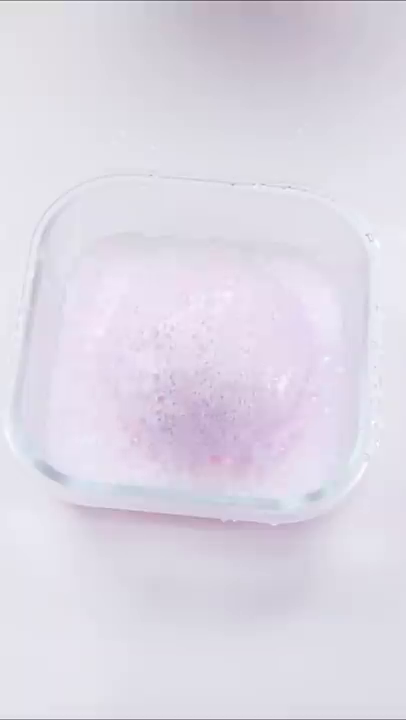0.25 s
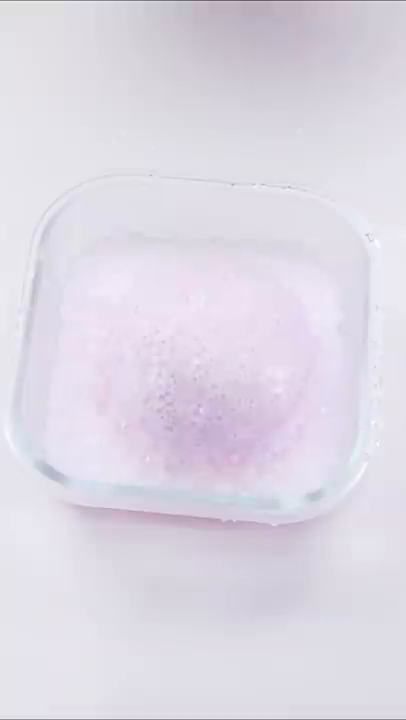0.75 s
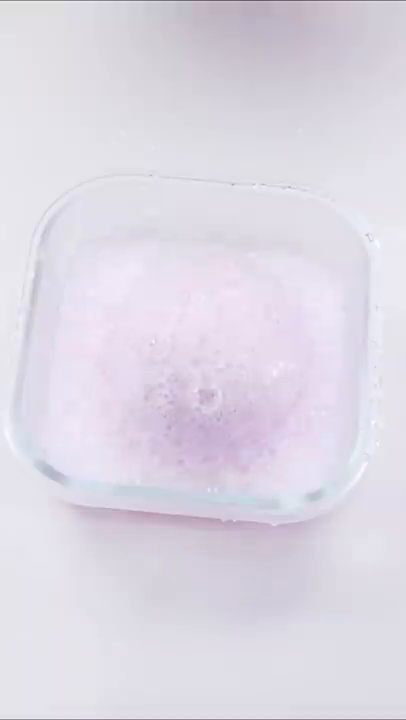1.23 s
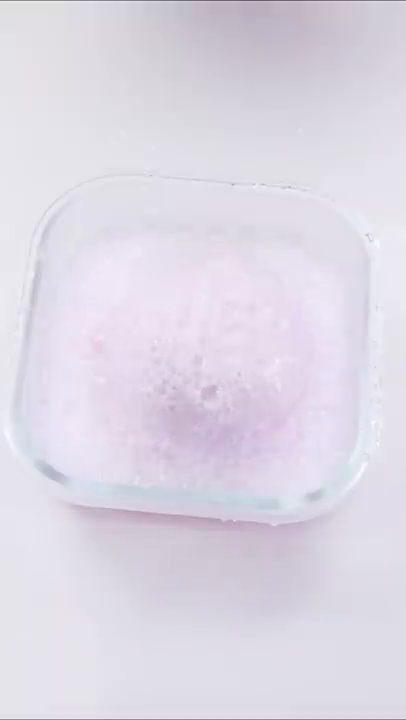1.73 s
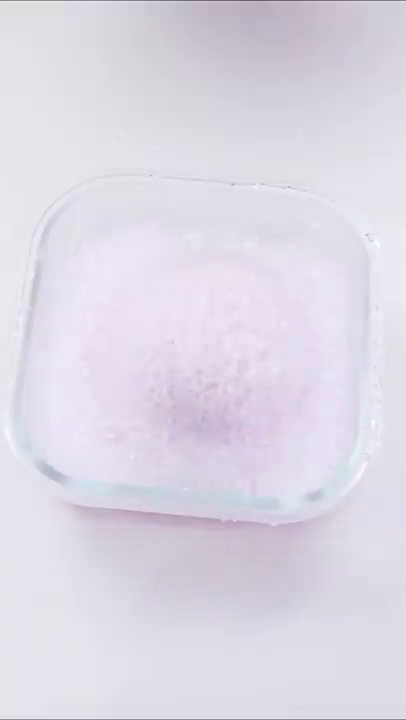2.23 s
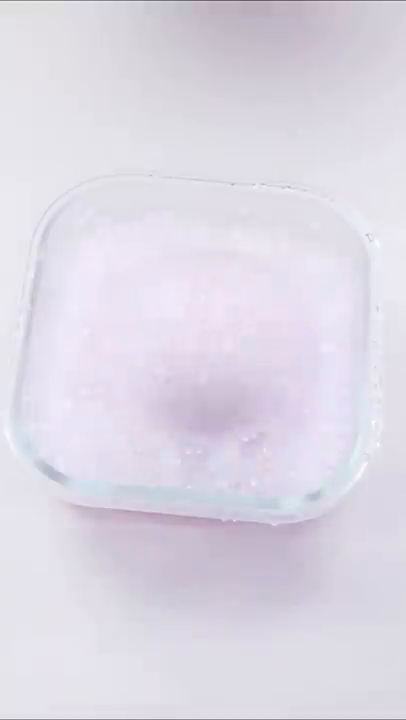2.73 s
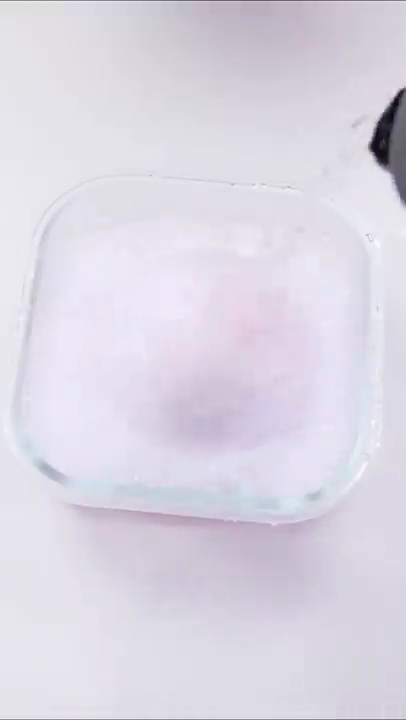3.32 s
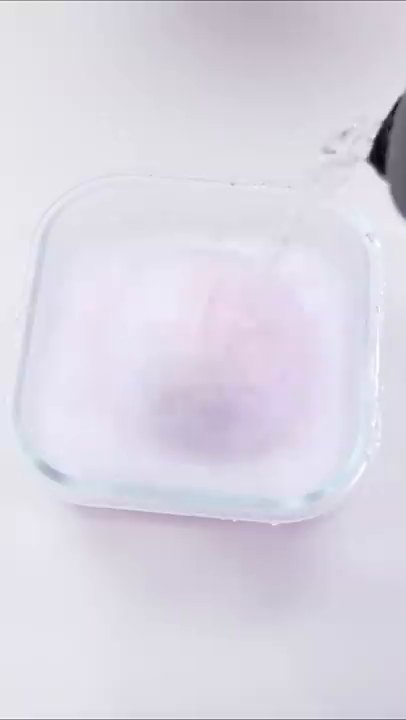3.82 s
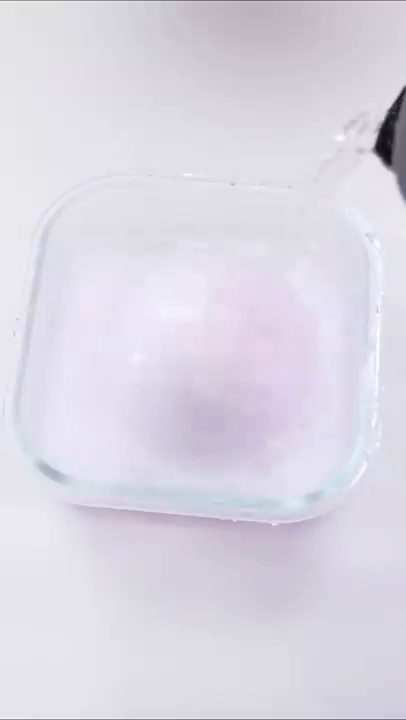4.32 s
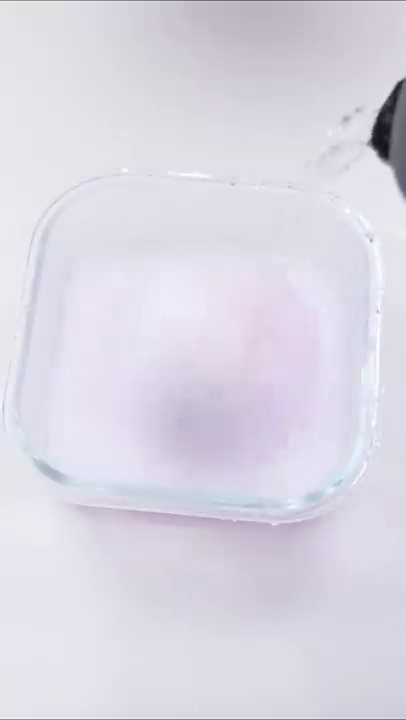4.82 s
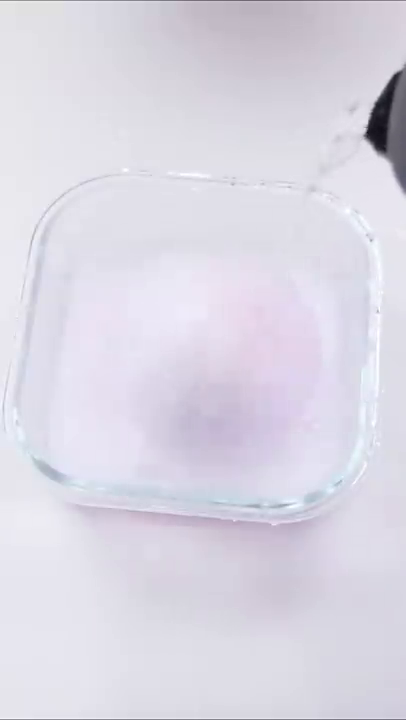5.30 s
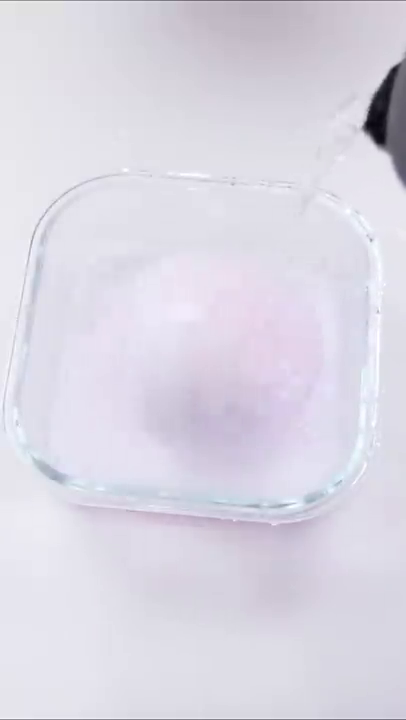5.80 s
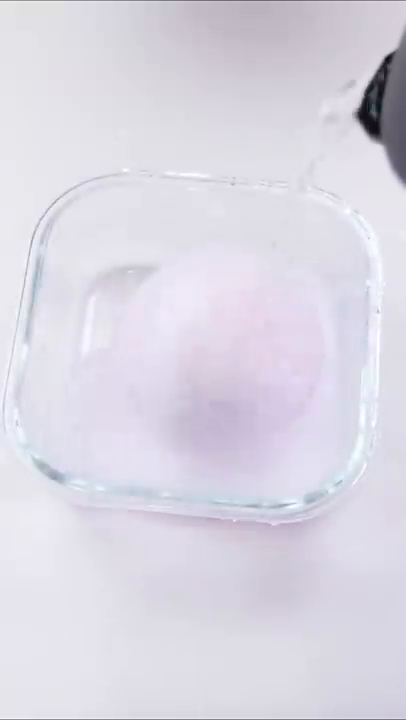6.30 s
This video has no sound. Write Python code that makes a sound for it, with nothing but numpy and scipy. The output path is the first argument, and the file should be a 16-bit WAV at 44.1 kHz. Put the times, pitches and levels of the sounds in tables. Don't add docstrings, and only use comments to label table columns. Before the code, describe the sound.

A large bath bomb fizzes densely in a glass dish of water, its bright crackling hiss swelling as more water is poured over it.

```python
import sys
import numpy as np
from scipy import signal
from scipy.fft import rfft, irfft
from scipy.io import wavfile
from scipy.ndimage import uniform_filter1d

SR = 44100
rng = np.random.default_rng(int(sys.argv[2]) if len(sys.argv) > 2 else 0)


def decibels_to_gain(level_db):
    exponent = np.asarray(level_db, float) / 20
    return 10 ** exponent


def generate_wav(signal):
    frames = np.transpose(np.atleast_2d(signal))
    scaled = np.clip(frames, -1, 1) * 32767
    pcm = np.round(scaled).astype(np.int16)
    wavfile.write(sys.argv[1], SR, pcm)


N = 288850

# time_s, vigour_db below its height, smallness of the bubbles_db_per_octave
REACTION = [(0, -10, -2), (.5, -7.5, 0.5), (1.2, -5.5, 0.5), (1.8, -3.5, 2.5), (2.1, -1.5, 2),
            (2.5, -1.5, 1.5), (2.9, -0.5, -1), (3.1, .3, -1.5), (3.3, -1.5, -2.5), (3.6, -2, -3),
            (4.2, -3, -3.5), (4.8, -4.5, -1.5), (5.4, -5, -1.7), (5.9, -5, 0), (6.15, -5, 0.5),
            (6.55, -5.5, .5)]
# pitch_hz, level_db
HISS_TONE = [(2940, -56), (5000, -28), (5440, -11.5), (5890, -10.5), (6930, -4.5), (7730, -0.5),
             (9060, 0.5), (13300, -2.5), (15100, -7.5), (15900, -16), (16300, -25)]
# pitch_hz, level_db
SIZZLE_TONE = [(1060, -41), (1800, -10.5), (2060, -7.5), (2350, -5.5), (3330, -0.5), (4050, 0.5),
               (4760, -1.5), (6660, 0.5), (7500, -2.5), (9750, -12), (16500, -120)]
# centre_s, strength_db, pitch_hz, length_s
GUSHES = [(.85, 1.5, 1700, .12), (1.2, 1.7, 7500, .3), (1.4, 2, 1300, 0.18), (1.95, 1.2, 14500, .15),
          (2.0, 1.5, 560, .1), (2.13, 4.5, 3000, .027), (2.55, 0.5, 2900, .15), (2.72, 1.2, 14500, .2),
          (2.85, 1.5, 850, .3), (2.972, 4, 2600, 0.014), (3.0, 2, 13000, .02), (3.09, 5, 2800, .04),
          (3.1, 0.5, 540, .08), (3.196, -3, 3400, .008), (3.214, 4.5, 3400, .02), (3.24, 8, 175, 0.1),
          (3.217, 3.5, 2250, .06), (3.233, 2.5, 4500, .03), (3.497, 2.5, 3500, .06), (4.1, 1, 2150, 0.13),
          (4.33, 2.5, 700, .08), (4.5, 3.5, 637, .15), (4.584, 4.5, 3000, .03), (5.0, 1, 1050, .15),
          (5.3, 2, 1080, .3), (5.582, 9, 4200, .013), (5.5, 0.5, 720, .2), (5.688, 5, 2900, 0.043),
          (5.87, 2.5, 1150, .1), (5.93, 3.5, 4000, 0.054)]
# pitch_hz, level_db
SEETHE_TONE = [(900, -40), (1300, -5), (1600, 1.5), (2100, -2), (3000, -30)]
# pitch_hz, level_db
FOAM_TONE = [(120, -40), (200, -3), (298, -9), (466, 0.5), (729, 0), (882, -2), (1090, -1), (1450, -6),
             (1880, -34), (3190, -120)]
# time_s, pitch_hz
HUM_PITCH = [
    (0, 700),
    (1.4, 690),
    (2.4, 574),
    (3.2, 543),
    (3.8, 600),
    (4.3, 700),
    (4.7, 630),
    (5.0, 745),
    (5.5, 690),
    (6.55, 680),
]
# pitch_hz, width_hz, level_db
GLASS_MODES = [(4000, 130, 1), (7830, 560, 0.5), (8800, 500, -1.5), (9630, 530, 1), (10500, 500, -1.5),
               (11800, 600, 0.5), (6640, 600, -3.5)]
# pitch_hz, level_db
WASH_TONE = [(76, -39), (130, -12.5), (236, -4.5), (306, -6), (400, 1.5), (520, -5), (880, -120)]
# pitch_hz, likeness (-1 to 1)
PORT_LIKENESS = [(60, 0.61), (99, 0.89), (160, 0.9), (270, 0.96), (450, 0.97), (740, 0.94), (1220, 0.86),
                 (2010, 0.7), (3330, 0.31), (5500, -0.2), (9080, 0.16), (15000, 0.051)]
# pitch_hz, left minus right_db
PORT_BALANCE = [(60, 2), (99, 5), (160, -2), (270, 1), (450, -0.5), (740, 0), (1220, -1.5), (2010, 1.5),
                (3330, 1.0), (5500, -0.5), (9080, 0.5), (15000, 0.5)]
# pitch_hz, phase_rad
PORT_LEAD = [(500, 0), (1400, .25), (1900, -.2), (3200, -.3), (4200, 0)]
# peak_s, level_db, pitch_hz, swell_s, port difference (share)
KNOCKS = [
    (.170, -40, 430, 0.0033, .2),
    (.177, -39.5, 450, .003, .3),
    (.281, -48, 203, 0.011, .1),
    (.288, -43, 430, .004, .4),
    (0.47, -39.5, 470, .002, .3),
    (.716, -43, 560, .003, .35),
    (1.389, -46, 1310, .007, 1.6),
    (1.416, -52, 1050, .004, 1.4),
]
# pitch_hz, level_db
SLOSH_TONE = [(32, -35), (55, -8), (65, -10), (102, -0.5), (150, -1.5), (200, -17), (330, -120)]
# centre_s, strength_db
SLOSHES = [
    (.27, 6),
    (1.62, 3),
    (1.98, 3),
    (3.15, 6.5),
    (3.28, 10.5),
    (3.85, 2),
    (4.55, 4),
    (5.42, 4),
    (5.87, 3),
    (6.33, 5),
]
# pitch_hz, level_db
ROOM_TONE = [(8.8, -32), (15, -4), (38, 0), (60, -9), (78, -35), (130, -120)]
# centre_s, strength_db
ROOM_SWELLS = [
    (1.46, 3),
    (2.42, 5),
    (4.94, 5),
    (6.38, 1),
]

SIZE, HOP = 1024, 256
# level_db at the height of the reaction, share of the vigour it follows
HISS_LAW, SIZZLE_LAW, WASH_LAW = (-30.5, 0.37), (-33.5, 1.075), (-65.5, 0.84)
LOW_HUM_LAW, HIGH_HUM_LAW = (-50.5, 0.61), (-52, -0.086)
HISS_TILT_LAW = (-2, -0.18)
LARGEST_LAW = (-4, -0.83)
RING_LAW, RING_SMALL_SHARE = (0, 0.28), -0.39
SEETHE_DB = -56
POUR_S, FULL_S, SETTLE_S = 2.95, 4.97, 5.56
LARGEST_FILL_DB, LOW_HUM_FILL_DB, HIGH_HUM_FILL_DB = 2.1, 3.5, 2.5
WASH_FILL_DB, SLOSH_FILL_DB = 0.2, 2.5
HISS_THIN_DB_PER_S, WASH_THIN_DB_PER_S = -0.5, -3.5
LOW_HUM_THIN_DB_PER_S, HIGH_HUM_THIN_DB_PER_S = -5.1, -1.5
STIR_S, STIRRED_S, STIR_DB = 2.1, 3.5, 4.5
RIPPLE_DB, RIPPLE_S = 5.5, 0.48
SLOSH_DB, SLOSH_DB_PER_S, SLOSH_LENGTH_S = -78.5, 1.17, 0.08
ROOM_DB, ROOM_DB_PER_S, ROOM_SWELL_S = -75, 0.9, 0.12


def fizz():
    left, other = bursts(per_s=22000, spread_db=2.0)
    hz = np.fft.rfftfreq(SIZE, 1 / SR)[:, None] + 1
    t = np.arange(left.shape[1]) * HOP / SR
    unrest_db = 0.72 * patches(hz, t, bins=16, frames=2)
    unrest_db = unrest_db + 0.23 * patches(hz, t, bins=200, frames=2)
    colour = np.sqrt(hiss(hz, t) + sizzle(hz, t) + seethe(hz, t) + foam(hz, t) + wash(hz, t))
    colour = colour * decibels_to_gain(glass(hz) + unrest_db + gushes(hz, t))
    same = np.clip(read(PORT_LIKENESS, hz), -1, 1)
    lead = np.exp(1j * read(PORT_LEAD, hz))
    right = same * lead * left + np.sqrt(1 - same ** 2) * other
    ports = np.array([left, right])
    balance = decibels_to_gain(np.array([.5, -.5])[:, None, None] * read(PORT_BALANCE, hz))
    lift = np.sqrt(SIZE / (1 + same))
    return signal.istft(ports * colour * balance * lift, nperseg=SIZE, noverlap=SIZE - HOP)[1][:, :N]


def bursts(per_s, spread_db):
    draw = rng.random((N, 2, 3))
    sign = np.sign(draw[..., 1] - .5)
    size = decibels_to_gain(-spread_db * np.log(draw[..., 0] + 1e-3)) * sign
    clicks = evened(size * (draw[..., 2] < per_s / SR))
    return signal.stft(clicks.T, nperseg=SIZE, noverlap=SIZE - HOP)[2]


def hiss(hz, t):
    top_hz = 15000
    tone_db = read(HISS_TONE, np.minimum(hz, top_hz)) - 3.0 * np.maximum(hz - top_hz, 0) / 1000
    tilt_db = layer(HISS_TILT_LAW, t) * np.log2(np.maximum(hz, 5000) / 10000)
    level_db = layer(HISS_LAW, t) + HISS_THIN_DB_PER_S * thinning(t)
    return power(tone_db + tilt_db, level_db, hz, band=(7000, 15500))


def sizzle(hz, t):
    small_db = follow(REACTION, t)[1]
    largest_db = layer(LARGEST_LAW, t) + LARGEST_FILL_DB * filled(t)
    ring_db = layer(RING_LAW, t) + RING_SMALL_SHARE * small_db
    tone_db = read(SIZZLE_TONE, hz) + largest_db / (1 + (hz / 2500) ** 6)
    tone_db = tone_db + small_db * np.log2(np.clip(hz, 2000, 8000) / 4000)
    tone_db = tone_db + ring_db / (1 + ((hz - 3900) / 450) ** 2)
    return power(tone_db, layer(SIZZLE_LAW, t), hz, band=(2200, 6500))


def gushes(hz, t):
    lift_db = 0
    for s, db, f, length in GUSHES:
        lift_db = lift_db + db * np.exp(-((t - s) / length) ** 2 - (np.log2(hz / f) / 0.3) ** 2)
    return lift_db


def patches(hz, t, bins, frames):
    field = rng.standard_normal((len(hz), len(t)))
    across_pitch = uniform_filter1d(field, bins, 0)
    return evened(uniform_filter1d(across_pitch, frames, 1))


def seethe(hz, t):
    return power(read(SEETHE_TONE, hz), SEETHE_DB + 0 * t, hz, band=(1300, 2100))


def foam(hz, t):
    low_db = layer(LOW_HUM_LAW, t) + LOW_HUM_FILL_DB * filled(t) + LOW_HUM_THIN_DB_PER_S * thinning(t)
    high_db = layer(HIGH_HUM_LAW, t) + HIGH_HUM_FILL_DB * filled(t) + HIGH_HUM_THIN_DB_PER_S * thinning(t)
    octaves = np.log2(hz / follow(HUM_PITCH, t)[0])
    low = read(FOAM_TONE, hz) - 8 * np.minimum(octaves ** 2 / .5, 1.5) - 12 * (hz / 1500) ** 2
    high = read(FOAM_TONE, hz) - 14 * np.minimum(np.log2(hz / 1150) ** 2, 3)
    low_hum = power(low, low_db - 2.06, hz, band=(350, 850))
    return low_hum + power(high, high_db - 0.46, hz, band=(850, 1500))


def glass(hz):
    return sum(db / (1 + (2 * (hz - f) / width) ** 2) for f, width, db in GLASS_MODES)


def wash(hz, t):
    level_db = layer(WASH_LAW, t) + WASH_FILL_DB * filled(t) + stirred(t)
    return power(read(WASH_TONE, hz), level_db, hz, band=(140, 320))


def stirred(t):
    rising = np.clip((t - STIR_S) / (STIRRED_S - STIR_S), 0, 1)
    ripple_db = RIPPLE_DB * np.exp(-(t / RIPPLE_S) ** 2)
    return ripple_db + STIR_DB * rising + WASH_THIN_DB_PER_S * thinning(t)


def filled(t):
    return np.clip((t - POUR_S) / (FULL_S - POUR_S), 0, 1)


def thinning(t):
    return np.maximum(t - SETTLE_S, 0)


def layer(law, t):
    level_db, share = law
    return level_db + share * follow(REACTION, t)[0]


def power(shape_db, level_db, hz, band):
    p = decibels_to_gain(shape_db) ** 2 * np.ones(len(level_db))
    inside = (hz[:, 0] > band[0]) & (hz[:, 0] < band[1])
    return p / p[inside].sum(0) * decibels_to_gain(level_db) ** 2


def read(points, hz):
    f, value = np.transpose(points)
    return np.interp(np.log(hz + 1), np.log(f + 1), value)


def follow(rows, t):
    s, *columns = np.transpose(rows)
    return [np.interp(t, s, c) for c in columns]


def evened(x):
    return x / np.sqrt(np.mean(x ** 2) + 1e-20)


def knocks():
    t, out = np.arange(N) / SR, np.zeros((2, N))
    for s, db, f, swell, apart in KNOCKS:
        near = slice(round((s - .04) * SR), round((s + .02) * SR))
        u = t[near] - s
        shape = np.exp(np.where(u < 0, u / swell, -u / 0.0012))
        ports = 1 + np.array([[1], [-1]]) * apart
        out[:, near] += decibels_to_gain(db) * ports * shape * np.cos(2 * np.pi * f * u)
    return out


def slosh():
    t = np.arange(N) / SR
    level_db = SLOSH_DB + SLOSH_DB_PER_S * t + SLOSH_FILL_DB * filled(t)
    return rumble(SLOSH_TONE, level_db + swells(SLOSHES, t, SLOSH_LENGTH_S), apart_db=-15)


def room():
    t = np.arange(N) / SR
    level_db = ROOM_DB + ROOM_DB_PER_S * t + swells(ROOM_SWELLS, t, ROOM_SWELL_S)
    return rumble(ROOM_TONE, level_db, apart_db=-12)


def swells(rows, t, length):
    return sum(db * np.exp(-((t - s) / length) ** 2) for s, db in rows)


def rumble(tone, level_db, apart_db):
    shape = decibels_to_gain(read(tone, np.fft.rfftfreq(N, 1 / SR)))
    mid, side = irfft(rfft(rng.standard_normal((2, N))) * shape, N)
    return decibels_to_gain(level_db) * (evened(mid) + np.array([[1], [-1]]) * decibels_to_gain(apart_db) * evened(side))


def scene():
    return fizz() + knocks() + slosh() + room()


def top_cut(x):
    return signal.sosfilt(signal.butter(12, 16480, fs=SR, output="sos"), x)


def record(dry):
    kept = np.fft.rfftfreq(N, 1 / SR) < 15715
    mix = irfft(rfft(dry) * kept, N)
    return top_cut(mix)


dry = scene()
out = record(dry)
generate_wav(out)
```